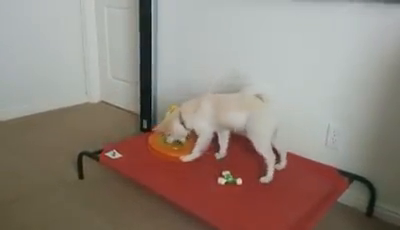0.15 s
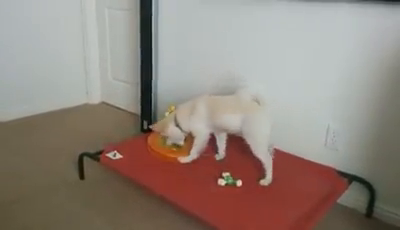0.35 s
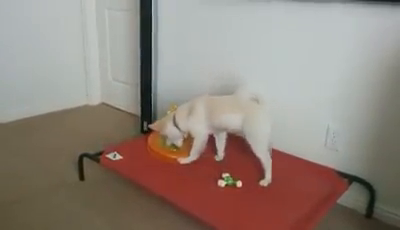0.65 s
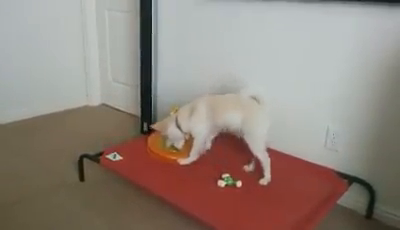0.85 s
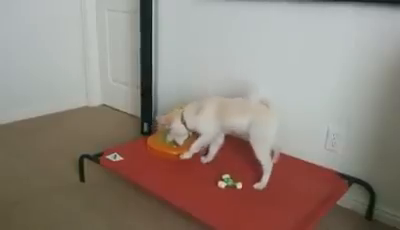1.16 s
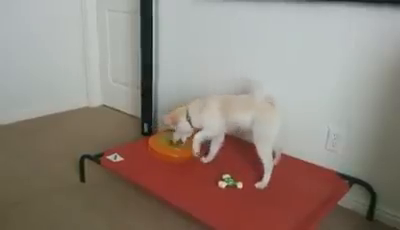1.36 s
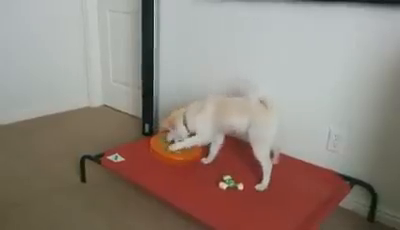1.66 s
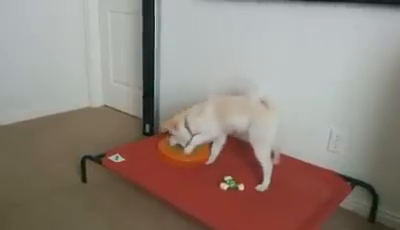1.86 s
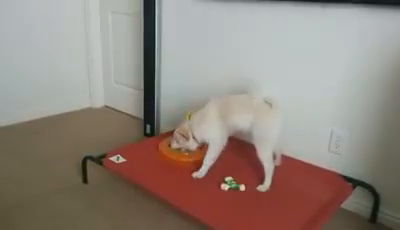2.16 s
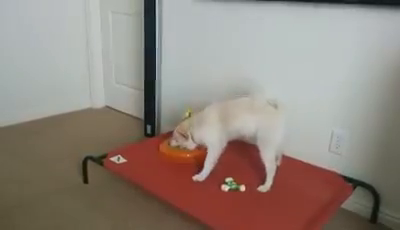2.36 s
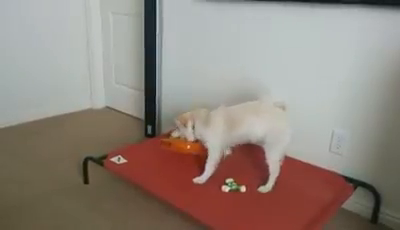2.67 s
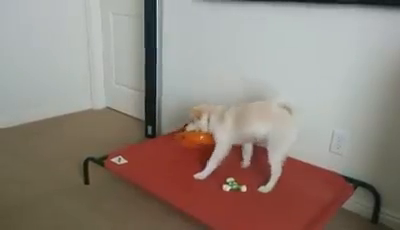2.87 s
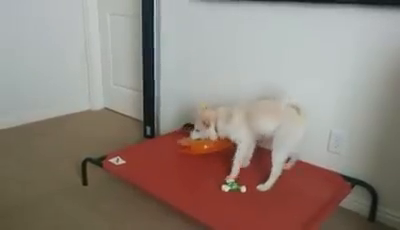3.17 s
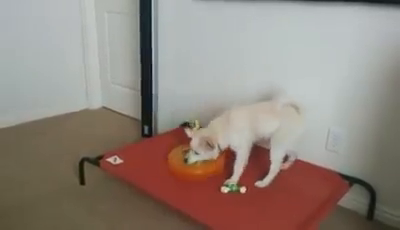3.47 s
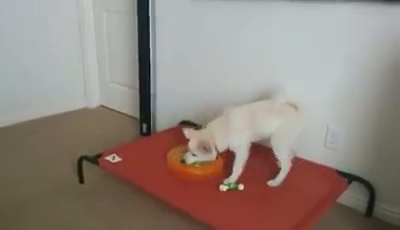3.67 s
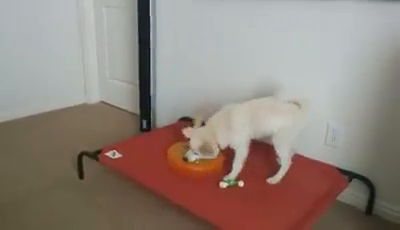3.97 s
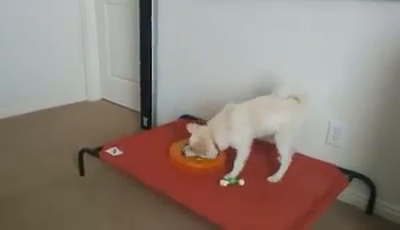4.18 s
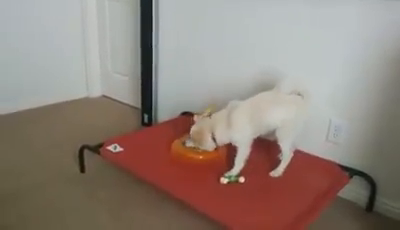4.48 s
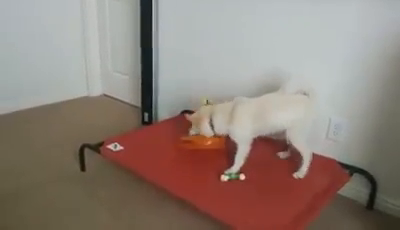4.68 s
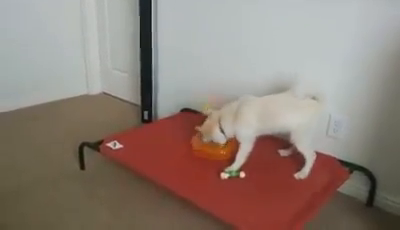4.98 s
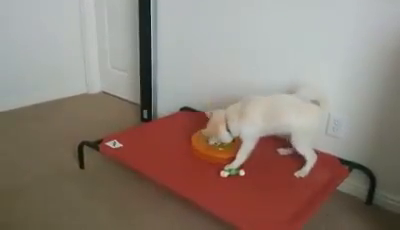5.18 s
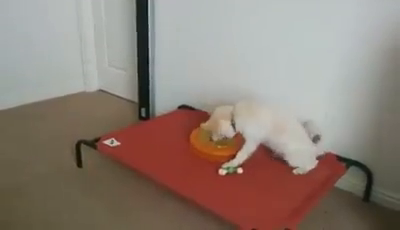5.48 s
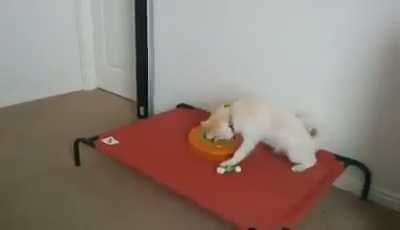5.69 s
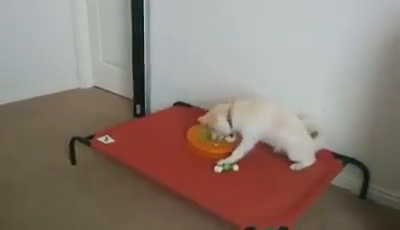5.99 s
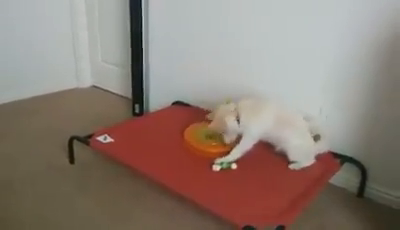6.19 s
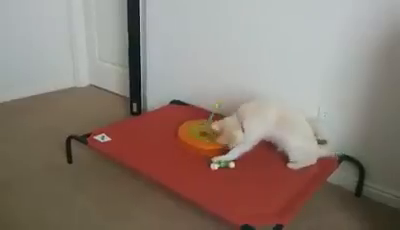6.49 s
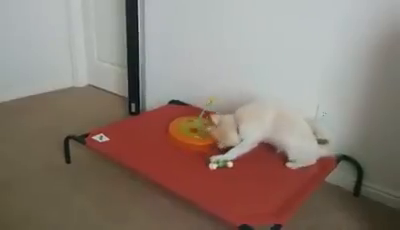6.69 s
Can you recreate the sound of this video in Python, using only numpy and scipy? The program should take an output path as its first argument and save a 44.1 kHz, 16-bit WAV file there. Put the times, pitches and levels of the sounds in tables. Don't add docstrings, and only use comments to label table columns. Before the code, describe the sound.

A hollow plastic treat toy is nosed, pawed and bitten on a taut fabric cot in a bare room. Small dull knocks open the scene at 0 and around 0.3 s, with soft cloth rubbing, then mostly quiet until 1.2 s. A loud crisp clack lands at 1.5, a sharp tooth click at 1.74, and a dense rattling run at 1.85-1.95. More knocks come at 2.2, a bright hard cluster at 2.5, and hollow bumps with a thud at 2.8-3.0. Single or paired clacks follow at 3.35, 3.6, 3.8, 4.3 and 4.6, with scuffs between. Further knocks fall at 5.2, 5.55, 5.8 and 5.95, then a bright click at 6.08. Near silence follows, with one faint tick at 6.76. Treats crackle briefly with the blows; the distant microphone gives short, abruptly gated echoes over faint hiss.

```python
import sys
import numpy as np
from scipy import signal
from scipy.fft import rfft, irfft
from scipy.io import wavfile
from scipy.ndimage import uniform_filter1d, minimum_filter1d

SR = 44100
rng = np.random.default_rng(int(sys.argv[2]) if len(sys.argv) > 2 else 0)


def nominal_scale(level):
    x = np.asarray(level, float) / 20
    return 10 ** x


def materialize(psi):
    bounded = np.clip(np.atleast_2d(psi).T, -1, 1)
    quanta = np.round(bounded * 32767).astype(np.int16)
    wavfile.write(sys.argv[1], SR, quanta)


N = 302085
KNOCK_T = np.arange(0, 0.12, 1 / SR)


def evened(x):
    return x / np.sqrt(np.mean(x ** 2) + 1e-20)


def read(points, hz):
    f, value = np.transpose(points)
    return np.interp(np.log(hz + 1), np.log(f + 1), value)


def add(mix, s, sound):
    part = mix[round(s * SR):][:len(sound)]
    part += sound[:len(part)]


def band(x, lo_hz, hi_hz):
    return signal.sosfilt(signal.butter(2, [lo_hz, hi_hz], "band", fs=SR, output="sos"), x)


def hush(db):
    # pitch in Hz, level in dB per Hz.
    hush_curve = [(20, 5), (50, -1), (120, 4), (400, -2), (790, -2), (1400, -9.5), (5000, -13.5),
                  (16000, -18.5)]
    hz = np.fft.rfftfreq(N, 1 / SR)
    spectrum = rfft(rng.standard_normal(N)) * nominal_scale(read(hush_curve, hz))
    return nominal_scale(db) * evened(irfft(spectrum, N))


def room(x):
    # pitch in Hz, time to die by 60 dB in seconds.
    room_decay = [(150, 0.13), (500, 0.17), (1500, 0.11), (4000, 0.14), (10000, 0.23)]
    late_t60, late_db = 0.54, -20
    first_echo_s, gap = 0.003, 20
    taps = np.zeros(SR)
    at = np.arange(round(first_echo_s * SR), SR - gap, gap)
    taps[at + rng.integers(0, gap, len(at))] = rng.choice([-1., 1.], len(at))
    hz, t, z = signal.stft(taps, SR, nperseg=256)
    fade = nominal_scale(-60 * t / read(room_decay, hz)[:, None])
    fade = fade + nominal_scale(late_db - 60 * t / late_t60)
    tail = signal.istft(z * fade, SR, nperseg=256)[1]
    return signal.fftconvolve(x, tail / np.linalg.norm(tail))[:N]


def cloth(extra_db, slips_per_s=1500):
    # start in seconds, length in seconds, pressure in dB, scratchiness in dB.
    strokes = [(0, 0.24, -59, -15), (0.384, 0.83, -68, -13), (1.239, .22, -53, -18),
               (1.562, 0.15, -51.5, -15), (1.792, 0.12, -53, 0.5), (2.002, 0.13, -58, -3),
               (2.436, 0.4, -61, -32.5), (2.696, 0.4, -54, -11), (3.03, 0.14, -55, -19.5),
               (3.2, 0.3, -65, -10), (3.56, 0.23, -85.5, 14), (3.669, 0.32, -50.5, -35),
               (3.92, 0.31, -66.5, 2), (4.164, 0.39, -55, -26), (4.64, .16, -80.5, 20.5),
               (4.735, 0.13, -76.5, 19.5), (4.838, 0.14, -77, 17.5), (4.993, 0.41, -54.5, -20),
               (5.264, .3, -56.5, -20), (5.596, 0.42, -52.5, -6), (5.92, 0.19, -67, 10),
               (6.094, 0.21, -91, 12), (6.7, 0.35, -72.5, 8.5)]
    still_db = -81.5
    press, scratch = np.full((2, N), nominal_scale(still_db))
    for s, length, db, scratch_db in strokes:
        swell = np.sin(np.pi * np.arange(0, 1, 1 / (length * SR))) ** 2
        add(press, s, nominal_scale(db) * swell)
        add(scratch, s, nominal_scale(db + scratch_db) * swell)
    strength = nominal_scale(2.8 * np.minimum(rng.exponential(1, N), 4.5))
    happens = rng.random(N) < slips_per_s / SR
    slips = strength * happens * rng.choice([-1, 1], N)
    dull = evened(band(slips, 120, 850)) * press
    fine = evened(band(slips, 1150, 2415)) * scratch
    hiss = nominal_scale(-12) * evened(band(slips, 2900, 6600)) * scratch
    return nominal_scale(extra_db) * (dull + fine + hiss)


def ring(modes, rise_s):
    spread_db, detune = 2, 0.04
    hz, db, t60 = np.transpose(modes)[:, :, None]
    luck_db, luck_hz = rng.standard_normal((2, len(modes), 1))
    sign = (-1.) ** np.argsort(np.argsort(hz, axis=0), axis=0)
    level = sign * nominal_scale(db + spread_db * luck_db - 60 * KNOCK_T / t60)
    waves = level * np.sin(2 * np.pi * hz * (1 + detune * luck_hz) * KNOCK_T)
    return evened(waves.sum(0) * (1 - np.exp(-KNOCK_T / rise_s)))


def cot_thump():
    # pitch in Hz, level in dB, time to die by 60 dB in seconds.
    cot_modes = [(59, -13.5, 0.026), (124, -4, 0.028), (217.5, 0, 0.084), (273, -5, 0.087),
                 (297, -6, 0.059), (393, -3, 0.08), (440, -5.5, 0.01)]
    return ring(cot_modes, 0.0022)


def shell_ring(main_hz):
    # pitch in Hz, level in dB, time to die by 60 dB in seconds.
    shell_modes = [(560, -8, 0.028), (630, 1.5, 0.018), (713.8, -1, 0.016), (978, -4.5, 0.017),
                   (1120, -2.5, 0.011), (1193, -3.5, 0.018), (1440, 3, 0.0089), (1756, -20.5, 0.0076)]
    modes = [(main_hz, -2, 0.02)]
    for hz, db, t60 in shell_modes:
        fall_db = 14.5 if hz < main_hz else 6.5
        modes.append((hz, db - fall_db * abs(np.log2(hz / main_hz)), t60))
    return ring(modes, 0.0012)


def wall_clack():
    # pitch in Hz, level in dB, time to die by 60 dB in seconds.
    wall_modes = [(1940, 13.5, 0.0013), (2193, -1.5, 0.016), (2350, -3, 0.0048), (3226, -3, 0.014),
                  (3750, 1, 0.0043), (3773, -3, 0.013), (4670, -13.5, 0.0065)]
    return band(ring(wall_modes, 0.00015), 1500, 5900)


def edge_tick():
    # pitch in Hz, level in dB, time to die by 60 dB in seconds.
    edge_modes = [(4910, 1.5, 0.0022), (6804, -6.5, .002), (7700, -9, 0.002), (8630, -14, 0.002),
                  (10500, -18, 0.0017), (12900, -24, .0015)]
    return ring(edge_modes, 0.0001)


def treat_crunch(clack_db, tick_db):
    t60, snap_db, snap_s = 0.048, 2.5, 0.0015
    noise = rng.standard_normal(2600)
    t = np.arange(len(noise)) / SR
    crack = noise * nominal_scale(-60 * t / t60 + snap_db * np.exp(-t / snap_s))
    crack = np.pad(crack, (0, len(KNOCK_T) - len(crack)))
    body = evened(band(band(crack, 1200, 4300), 900, 4400))
    sizzle = band(band(crack, 5500, 9000), 3000, 9350)
    bright = evened(band(crack, 4100, 6000) + nominal_scale(-7) * sizzle)
    return nominal_scale(clack_db - 5) * body + nominal_scale(tick_db - 6.5) * bright


def chatter(sound):
    bounce_s, fall_db = 0.04, 22
    when, size = rng.random((2, 40))
    blows = np.zeros(len(sound))
    blows[(when * bounce_s * SR).astype(int)] = (2 * size - 1) * nominal_scale(-2.5 - fall_db * when)
    blows[0] = 0.6
    return signal.fftconvolve(sound, blows / np.linalg.norm(blows))[:len(sound)]


def knock(main_hz, db, weight_db, hard_db, edge_db):
    clack_db = db + hard_db
    tick_db = clack_db + edge_db
    shell = nominal_scale(db) * shell_ring(main_hz)
    walls = nominal_scale(clack_db - 1.5) * wall_clack()
    edges = nominal_scale(tick_db - 6) * edge_tick()
    thump = nominal_scale(db + weight_db - 1.5) * cot_thump()
    return chatter(shell + walls + edges) + treat_crunch(clack_db, tick_db) + thump


def toy(extra_db):
    # start in seconds, main pitch in Hz, strength in dB, weight on the cot in dB.
    nudges = [(.122, 650, -59, -18), (0.427, 540, -60, 3.5), (.74, 794, -67.5, -19), (.857, 630, -63.5, 7),
              (1.147, 670, -58.5, -1.5), (1.329, 617, -79, -8), (1.388, 660, -56.5, -32),
              (2.441, 676, -66, -23), (2.877, 620, -79, 6), (3.219, 687, -66.5, -7.7), (3.41, 770, -60, 4),
              (3.76, 476, -58.5, 5.5), (3.946, 618, -59.5, -2), (4.169, 634, -61, 4), (4.213, 625, -61, 3),
              (4.445, 645, -73, -4), (4.564, 650, -63.5, 4), (4.766, 1576, -58.5, -37),
              (4.87, 1306, -57.5, -18), (4.916, 1390, -63, -20.5), (5.068, 726, -61, 3.5),
              (5.128, 640, -57, -9), (5.316, 560, -58, 1.8), (5.401, 577, -77.5, 15),
              (5.759, 708, -52, -10), (5.907, 1690, -57.5, -4.5), (6.019, 730, -58.5, 1.5)]
    # as above, then hardness in dB.
    nose = [(.265, 630, -49.5, -12, -21), (.344, 633, -48.5, 4, -25), (.364, 554, -56, -16, -15),
            (1.236, 715.5, -42.5, -12, -16), (1.445, 721.4, -43, -15, -7), (1.905, 719, -40, -26, -7),
            (2.194, 667, -43.5, -19, -20.5), (2.236, 680, -48, -14, 0.5), (2.255, 570, -43.5, 0.8, -7.5),
            (2.82, 654, -72, 26, 18.5), (2.91, 903, -37.5, -12, -2), (2.965, 1176, -41, 5.5, -6),
            (2.98, 606, -45.5, -19, -0.7), (3.065, 714, -58, 10.5, -35), (3.346, 712.2, -45, -9.5, -6.5),
            (3.691, 667, -48, -10.5, -7.5), (3.804, 1050, -41.5, -5, -19), (3.835, 900, -53, 7.5, -6),
            (4.33, 488, -46.5, -5.5, -8.5), (5.171, 938, -50, -43.5, -10), (5.522, 877, -42.5, -10.5, -8),
            (5.569, 610, -42.5, 3, -8.5), (5.59, 593, -53.5, 5, -7.5), (5.954, 729, -40.5, -39, -2)]
    claws = [(.012, 620, -48.5, -9, -17), (.022, 686, -83, -17, -25), (.036, 590, -70, -11, -23),
             (.284, 570, -63.5, 4, -16), (.376, 644, -85, -31, -4), (1.519, 671, -34.5, 4, -4.5),
             (1.536, 1565, -39, -10, -7), (1.844, 726, -44.5, -6, -13.5), (1.864, 657, -41, -2, -11),
             (1.891, 723, -37, -5.5, -16), (1.933, 633, -36, -11, -1.4), (1.95, 936, -43.5, 3.5, -3),
             (2.51, 1120, -45, -39, -0.5), (2.518, 1160, -36, -18, -9), (2.734, 696, -50, -12, -18.5),
             (2.801, 738, -43, -2, -11.5), (3.578, 780, -40, -8, -9.5), (4.294, 1023, -46, -12.5, 0.8),
             (4.612, 1184, -48, -33, -12), (4.632, 1133, -47.5, -33, 0.5), (5.82, 1574, -46.5, -37, 2.5),
             (6.084, 1436, -43, -52, 3)]
    teeth = [
        (1.671, 680, -62, -6.5, -2),
        (1.711, 1550, -64.5, -15, 6),
        (1.743, 1120, -43, -13, -2),
        (2.488, 1180, -39, -43.5, -16.5),
        (2.497, 1120, -38, -13, -11.5),
        (2.538, 1122, -52, -16, -18),
        (5.698, 1430, -53.5, -11, 4.5),
        (5.806, 1735, -62, 2, 13.5),
        (6.764, 1440, -55, -39, 0.2),
    ]
    out = np.zeros(N)
    for s, hz, db, weight_db in nudges:
        add(out, s, knock(hz, db, weight_db, -16.5, -14))
    for rows, edge_db in [(nose, -17), (claws, -8.5), (teeth, 2.1)]:
        for s, hz, db, weight_db, hard_db in rows:
            add(out, s, knock(hz, db, weight_db, hard_db, edge_db))
    return nominal_scale(extra_db) * out


def scene():
    near = toy(2.83) + cloth(3.3)
    return (near + nominal_scale(2.5) * room(near) + hush(-61.5))[None]


def gate(x):
    opens_db, knee_db, step_db = -42.5, 3.5, -9.5
    sense_s, ahead_s = 0.016, 0.0032
    power = abs(uniform_filter1d(x ** 2, round(sense_s * SR)))
    level_db = 10 * np.log10(power + 1e-12)
    level_db = -minimum_filter1d(-level_db, round(2 * ahead_s * SR))
    opened = 0.5 + 0.5 * np.tanh((level_db - opens_db) / knee_db)
    return x * nominal_scale(step_db * (2 - uniform_filter1d(opened, size=300)))


def low_pass(x):
    return signal.sosfilt(signal.butter(12, 15970, fs=SR, output="sos"), x)


def record(dry, cut_hz=185):
    cut = signal.butter(2, cut_hz, "high", fs=SR, output="sos")
    x = signal.sosfilt(cut, signal.sosfilt(cut, dry))
    x = x + nominal_scale(-16) * dry
    mix = gate(x) + hush(-77.5) - 0.0004
    return low_pass(mix)


dry = scene()
out = record(dry)
materialize(out)
```